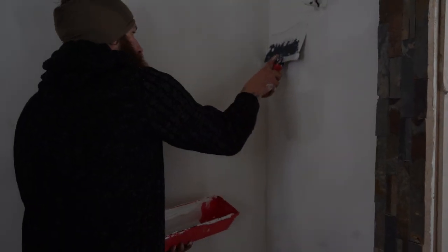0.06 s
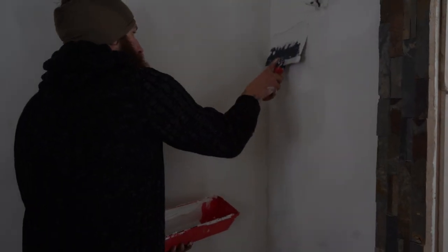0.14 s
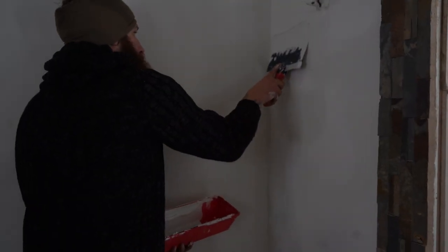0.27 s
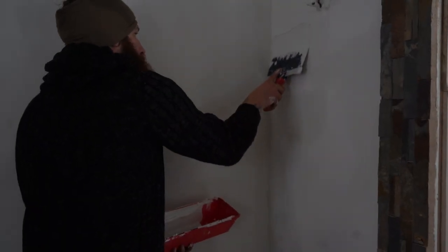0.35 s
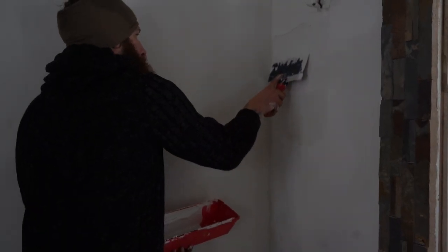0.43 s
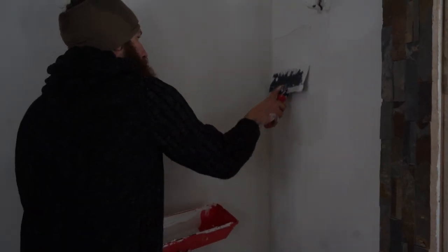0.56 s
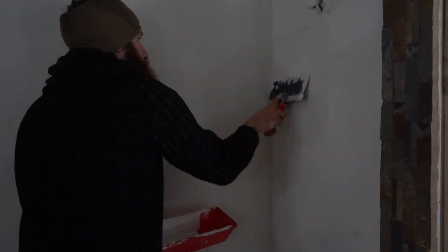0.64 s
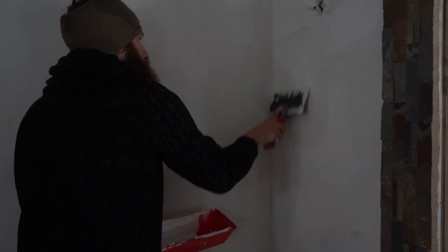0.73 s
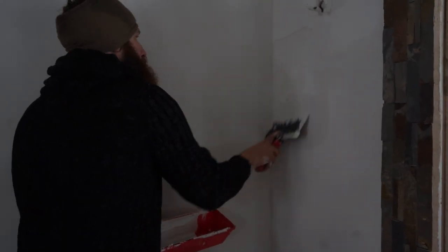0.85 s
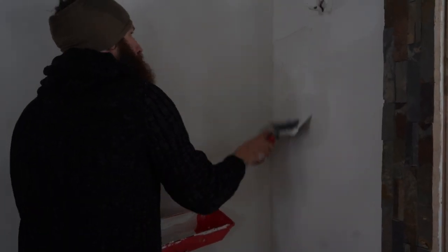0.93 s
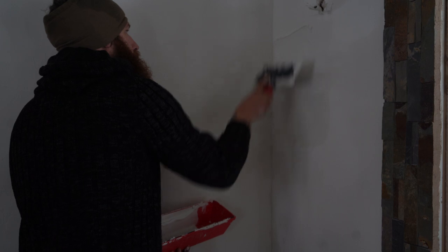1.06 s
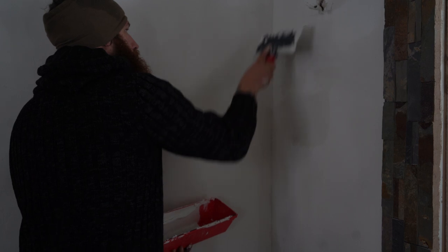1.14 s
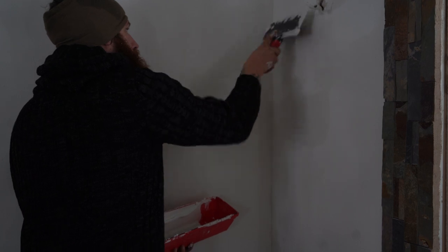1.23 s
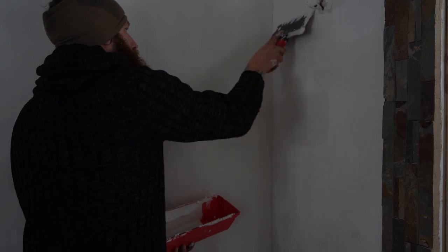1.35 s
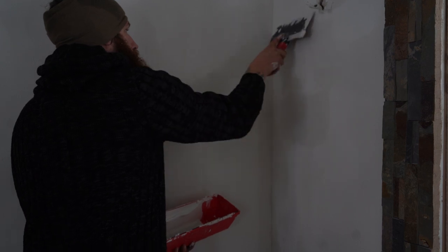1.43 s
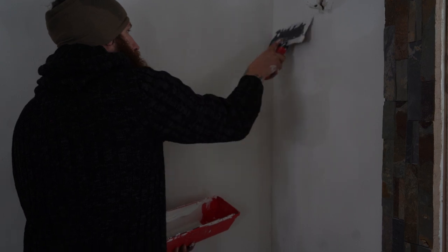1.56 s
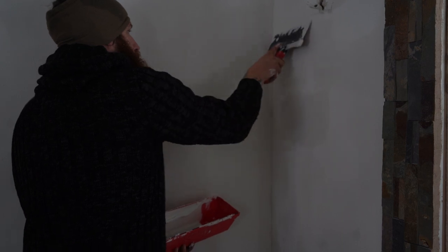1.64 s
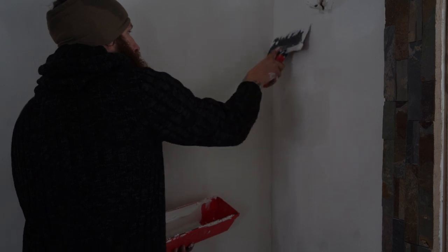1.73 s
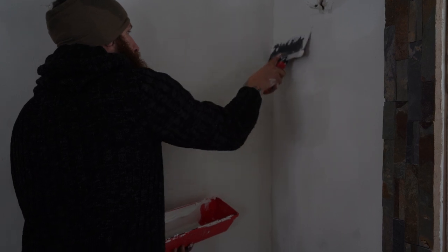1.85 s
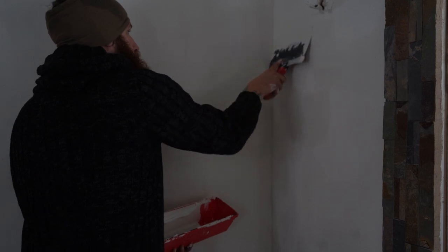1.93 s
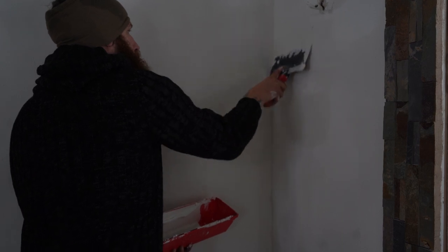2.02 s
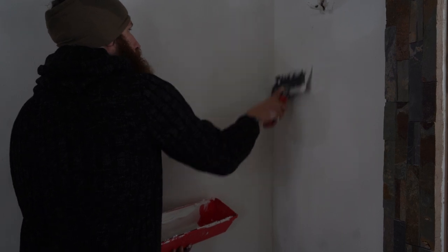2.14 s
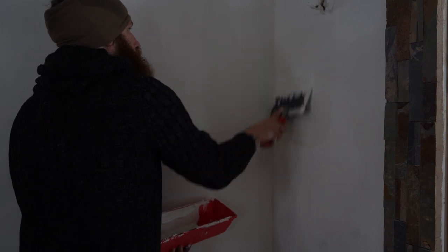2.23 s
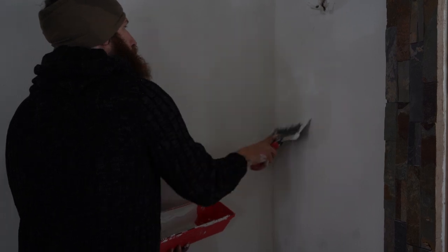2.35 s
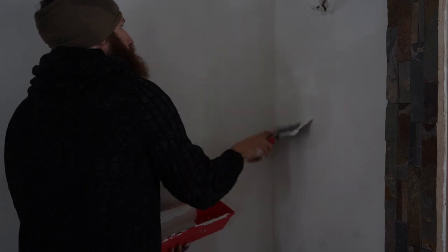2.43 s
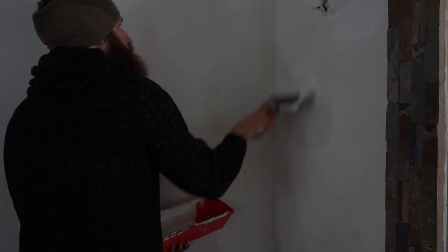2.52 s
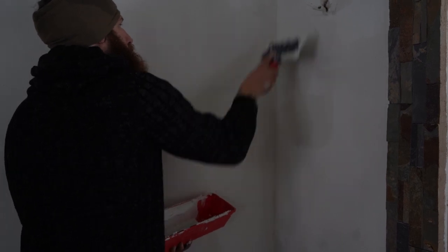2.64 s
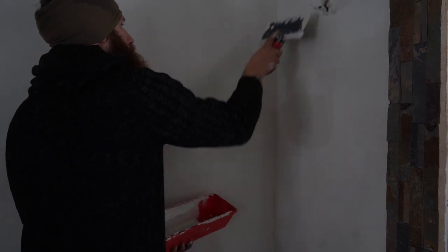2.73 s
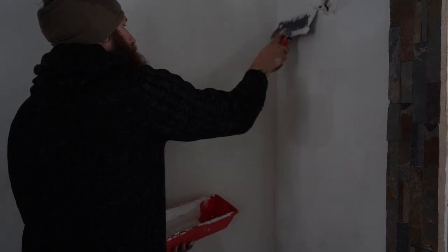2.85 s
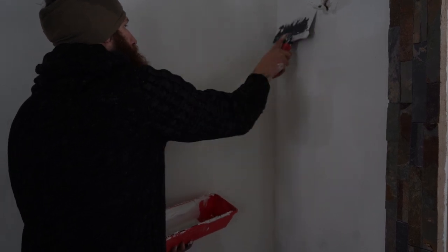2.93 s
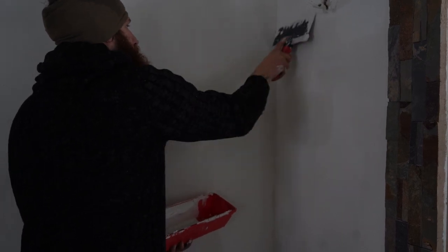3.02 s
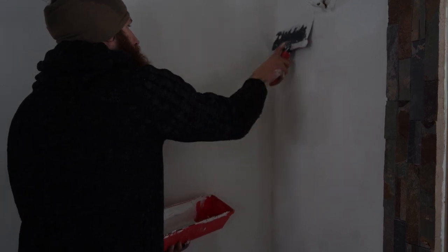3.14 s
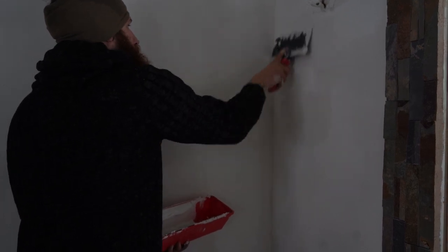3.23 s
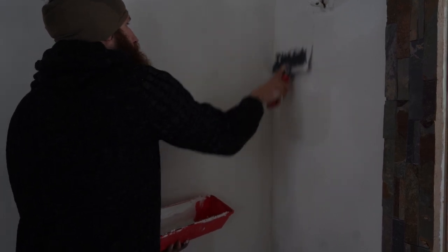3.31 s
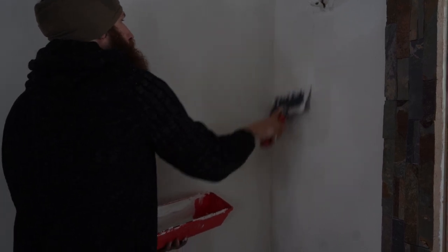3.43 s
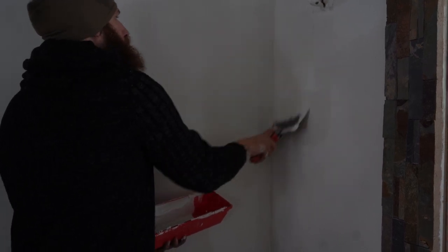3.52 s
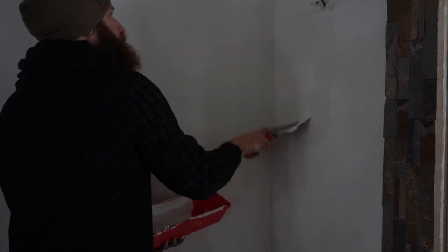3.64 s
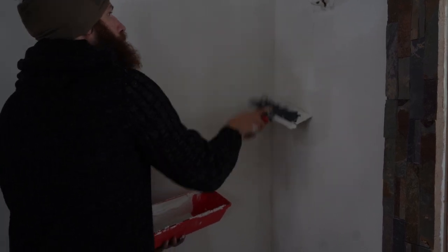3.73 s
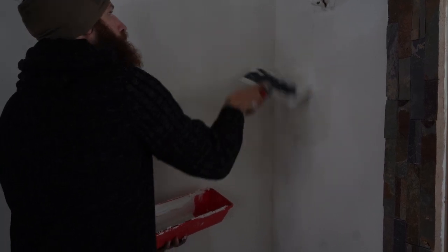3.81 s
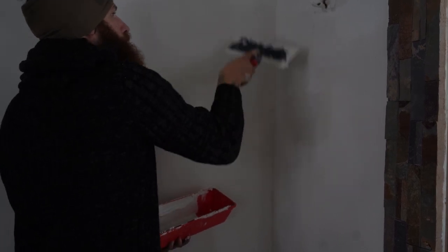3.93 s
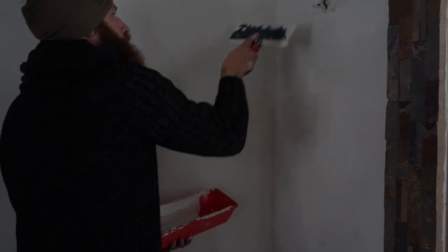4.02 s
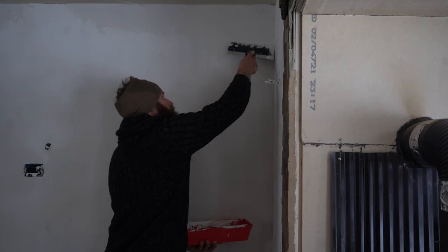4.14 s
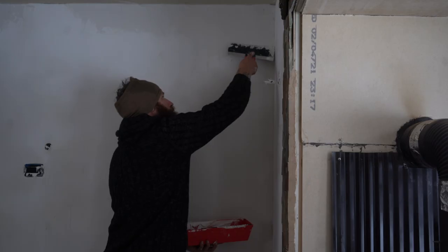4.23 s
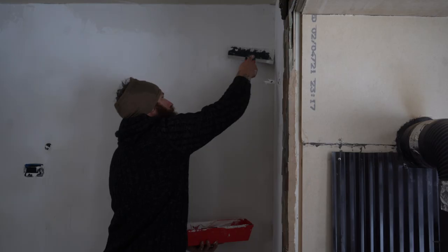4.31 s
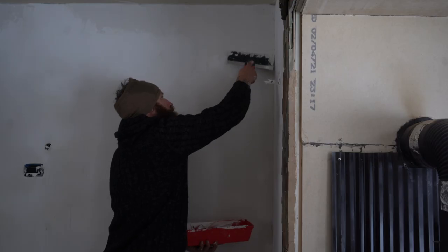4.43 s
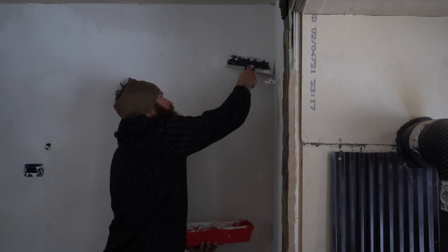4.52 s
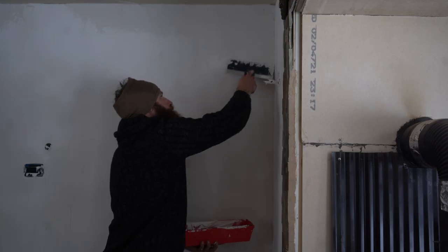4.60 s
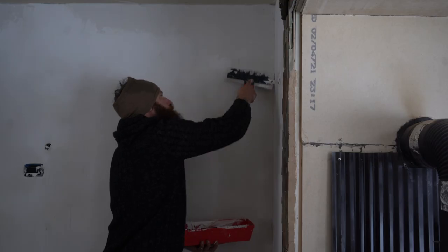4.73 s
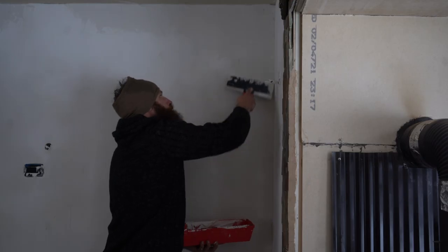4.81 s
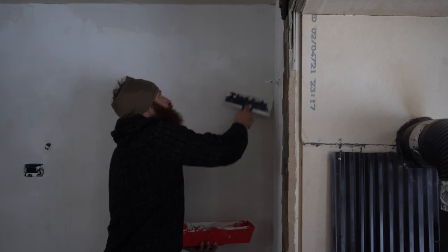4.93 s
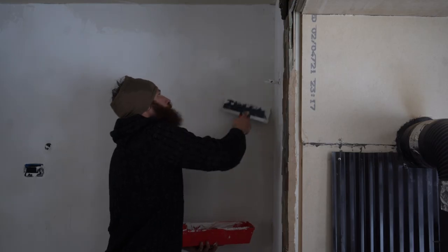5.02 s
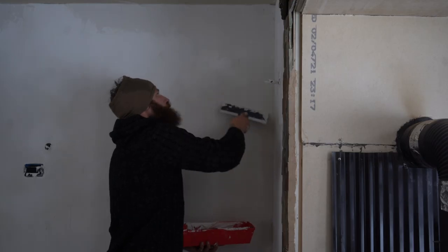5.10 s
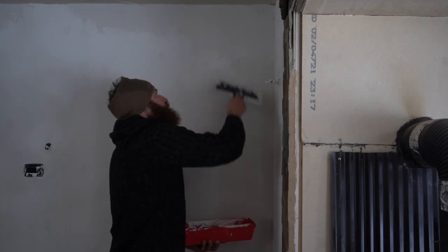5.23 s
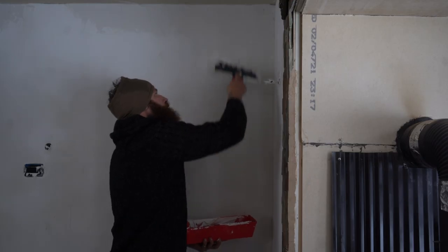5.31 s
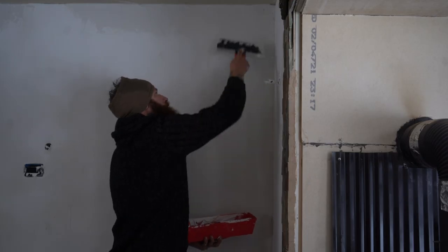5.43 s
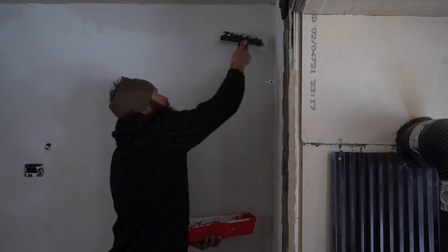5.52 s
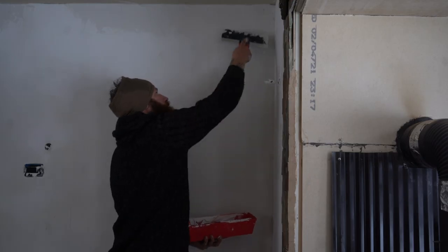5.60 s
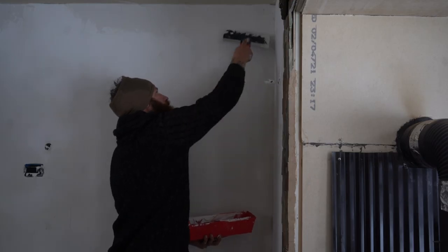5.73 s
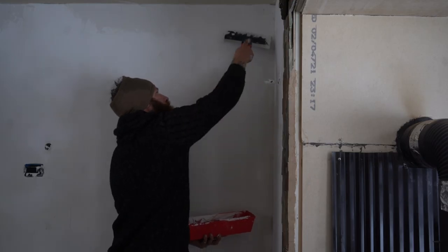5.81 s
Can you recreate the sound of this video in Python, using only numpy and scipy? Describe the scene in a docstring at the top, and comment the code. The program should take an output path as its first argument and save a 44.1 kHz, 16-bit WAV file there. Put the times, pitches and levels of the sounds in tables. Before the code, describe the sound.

A steel taping knife draws joint compound down a wall in a bare room. Three strokes each begin as a soft, wet smear and end in a short, dry, metallic rasp, with a knock as the blade is set down again. A wider knife then makes one quieter, duller stroke. Underneath are quiet room tone, a faint hum and a very low rumble of air at the microphone.

```python
"""A bare room, where a steel taping knife draws joint compound down a wall. Its edge slips over plaster
grains and rings the blade: three strokes start as a soft, wet smear and end in a dry rasp, with a knock
each time the blade is set down again. A wider knife then makes one duller stroke.
Underneath lie a quiet room tone with a faint hum and a very low rumble of air at the microphone."""
import sys
import numpy as np
from scipy import signal
from scipy.fft import rfft, irfft, next_fast_len
from scipy.io import wavfile
from scipy.ndimage import uniform_filter1d, map_coordinates

SR = 44100
rng = np.random.default_rng(int(sys.argv[2]) if len(sys.argv) > 2 else 0)


def digitize_waveform(pressure):
    """Quantize a signal to 16-bit integers and store it at the path in sys.argv[1].

    Rows of a 2-D input are taken as channels; values are limited to [-1, 1].
    """
    field = np.atleast_2d(pressure).T
    bounded = np.clip(field, -1, 1)
    quanta = np.round(bounded * 32767).astype(np.int16)
    wavfile.write(sys.argv[1], SR, quanta)


N = 258426
SECOND_WALL_S = 4.172  # the wide knife takes over, on another wall


def amp(db):
    """Decibels to gain."""
    return 10 ** (np.asarray(db) / 20)


def unit(x):
    """x at rms 1."""
    return x / np.sqrt(np.mean(x ** 2) + 1e-20)


def along(points, hz):
    """Read (f/Hz, value) points on a log frequency axis."""
    freqs, values = np.transpose(points)
    return np.interp(np.log(hz + 1), np.log(freqs + 1), values)


def clock():
    """The time of each sample in seconds."""
    return np.arange(N) / SR


def curve(points):
    """Join (t/s, value) points with straight lines."""
    return np.interp(clock(), *np.transpose(points))


def wobble(rate):
    """A smooth random curve, `rate` knots a second."""
    return map_coordinates(rng.standard_normal(int(N * rate / SR) + 4), [clock() * rate])


def bump(s, half):
    """A bell-shaped swell of height 1 around time s."""
    return np.exp(-np.minimum(((clock() - s) / half) ** 2, 60))


def blow(s, t60, attack):
    """An impact envelope that rises at time s and dies away."""
    t = np.maximum(clock() - s, 0)
    return (1 - np.exp(-t / attack)) * np.exp(-np.log(1000) * t / t60)


def filtered(x, response):
    """Equalise x by a gain that is a function of frequency."""
    size = next_fast_len(N + SR // 2)
    return irfft(rfft(x, size) * response(np.fft.rfftfreq(size, 1 / SR)), size)[:N]


def noise(colour):
    """Noise of rms 1, coloured by (f/Hz, level/dB) points."""
    return unit(filtered(rng.standard_normal(N), lambda hz: amp(along(colour, hz))))


def noise_band(centre_hz, width_hz):
    """Noise of rms 1 around one frequency."""
    band = lambda hz: 1 / (1 + ((hz - centre_hz) / (width_hz / 2)) ** 4)
    return unit(filtered(rng.standard_normal(N), band))


def background():
    """The bed: room tone, a soft hum that differs from wall to wall, and slow air at the microphone."""
    # colours of the room tone and the air rumble: f/Hz, level/dB
    tone_colour = [(26, -36), (45, 4), (96, -1.5), (165, -11.5), (200, -8), (397, -17.5), (438, -17.5),
                   (601, -17.5), (827, -22.5), (912, -18.5), (1030, -26.5), (2480, -27.5), (3020, -30),
                   (5570, -35), (15600, -49.5)]
    rumble_colour = [(3, -20.5), (9, -0.5), (14, 2), (20, -15.5), (35, -26), (60, -48), (120, -83),
                     (300, -120)]
    # hum bands by each wall: f/Hz, width/Hz, level/dB
    first_hum = [(100, 9, -73), (155.4, 14, -68.5), (233.7, 41, -69.5), (2470, 200, -80)]
    second_hum = [(102.8, 8.5, -68.5), (201.8, 9.2, -71), (599, 54, -74), (921, 51, -73.5),
                  (2530, 140, -78.5)]
    # swells of the rumble: t/s, level/dB
    rumble_swells = [(0.0, -32), (0.41, -25), (0.63, -41), (2.08, -34), (2.17, -46), (2.82, -25),
                     (2.95, -43), (4.06, -31), (4.19, -44), (5.85, -49)]
    hum = lambda bands: sum(amp(db) * noise_band(hz, width) for hz, width, db in bands)
    tone = amp(-58) * noise(tone_colour)
    tone += np.where(clock() < SECOND_WALL_S, hum(first_hum), hum(second_hum))
    return tone + amp(curve(rumble_swells)) * noise(rumble_colour)


def reverb_tail():
    """The short ring of the bare walls, of energy 1; the treble dies first."""
    # room decay: f/Hz, t60/s
    decay = [(150, 0.41), (1000, 0.38), (3000, 0.29), (8000, 0.35), (15000, 0.26)]
    hz, t, spectra = signal.stft(rng.standard_normal(SR * 3 // 5), SR, nperseg=256)
    fade = np.exp(-np.log(1000) * t / along(decay, hz)[:, None])
    echo = signal.istft(spectra * fade, SR, nperseg=256)[1]
    return np.pad(echo / np.linalg.norm(echo), (SR // 250, 0))  # 4 ms pre-delay


def room(x, wet_db, block=8192):
    """Add reverb at equal total power; each block gets a new tail, as the moving arm shifts the echoes."""
    wet = np.zeros(N + SR)
    for start in range(0, N, block):
        piece = x[start:start + block]
        if piece.any():
            echo = signal.fftconvolve(piece, reverb_tail())
            wet[start:start + len(echo)] += echo
    return (x + amp(wet_db) * wet[:N]) / np.hypot(1, amp(wet_db))


def clicks():
    """Small, sharp ticks of broad noise."""
    # ticks: t/s, level/dB, t60/s, width/Hz
    ticks = [(.471, -43, .015, 5000), (2.0, -44, .015, 8000), (3.244, -36, .014, 14000),
             (3.289, -43, .015, 14000), (4.172, -46, .0052, 12000), (4.4967, -45, .033, 7000)]
    return sum(amp(db) * blow(s, t60, attack=.0003) * noise_band(3500, width)
               for s, db, t60, width in ticks)


def squeal():
    """A faint squeal on the way up the wall: two thin, unsteady tones that glide together."""
    # pitch of the upper tone: t/s, f/Hz
    pitch = [(3.85, 12600), (3.915, 13500), (3.955, 12600), (4.0, 12850), (4.08, 12450)]
    hz = curve(pitch)
    start, end = pitch[0][0], pitch[-1][0]
    progress = np.clip((clock() - start) / (end - start), 0, 1)
    swell = np.sqrt(np.abs(np.sin(np.pi * progress)))
    tone = lambda ratio: np.sin(2 * np.pi * np.cumsum(ratio * hz * (1 + .004 * wobble(400))) / SR)
    return amp(-79) * swell * (tone(1) + tone(.745))


def chatter():
    """The edge catches: stick-slip locks briefly onto one resonance, with an unsteady pitch."""
    # catches: t/s, half length/s, f/Hz, level/dB
    catches = [(0.79, .02, 1144, -43.5), (0.869, 0.013, 1606, -36.5), (2.195, 0.022, 2286, -37.5),
               (2.372, .02, 1042, -44)]
    out = np.zeros(N)
    for s, half, hz, db in catches:
        phase = 2 * np.pi * np.cumsum(hz * (1 + .012 * wobble(250))) / SR
        out += amp(db) * bump(s, half) * np.sqrt(2) * np.sin(phase)
    return out


def knocks(rebound_s=.036):
    """The springy blade lands and rebounds once: a thud pitched by the spot, a boom, clack and scuff."""
    # landings: t/s, rise/s, board pitch ratio, boom/dB, thud/dB, clack/dB, scuff/dB, rebound/dB
    landings = [(1.3296, .0012, 1.01, -51, -36.5, -45, -58, -11),
                (2.868, .001, .92, -52, -37.5, -55, -55, -3), (3.662, .0045, .95, -36, -53, -49, -51, -13),
                (3.784, .012, .8, -42, -33, -27.5, -42, -20)]
    # thudding modes of the board under the blade: f/Hz, level/dB, t60/s
    board_modes = [(140.5, 0, .16), (224, -5, 0.12), (274, -5.5, 0.092), (322, -4.5, 0.11),
                   (439, -10, 0.065), (600, -16, .05), (960, -16, .05)]
    # colours of the whole wall panel, of blade and handle, and of steel on plaster: f/Hz, level/dB
    boom_colour = [(25, -16), (50, 3), (100, -2), (160, -8), (260, -26), (600, -71.5)]
    clack_colour = [(150, -22), (330, -0.5), (500, -2.5), (650, 1), (800, -7), (1050, -4.5), (2000, -20),
                    (5000, -29)]
    scuff_colour = [(400, -6.5), (1500, 12.5), (5000, 8), (8000, 3), (13000, -5), (16000, -17)]
    boom, clack, scuff = noise(boom_colour), noise(clack_colour), noise(scuff_colour)
    out = np.zeros(N)
    for landing, rise, pitch, boom_db, thud_db, clack_db, scuff_db, rebound_db in landings:
        for s, force in [(landing, 1), (landing + rebound_s, amp(rebound_db))]:
            for hz, db, t60 in board_modes:
                mode = np.sin(2 * np.pi * hz * pitch * (clock() - s))
                out += force * amp(thud_db + db + rng.normal(0, 1)) * blow(s, t60, rise) * mode
            out += force * amp(boom_db) * blow(s, .18, rise) * boom
            out += force * amp(clack_db) * blow(s, .08, rise) * clack
            out += force * amp(scuff_db) * blow(s, .13, rise) * scuff
    return out


def grain_slips(per_s):
    """Tiny slips of the edge over plaster grains, at random times and sizes."""
    counts = rng.poisson(per_s / SR, N)
    return unit(np.sqrt(counts) * rng.standard_normal(N))


def wander(x, depth_db):
    """The contact point wanders along the edge, so resonances swell and fade."""
    spectra = signal.stft(x, nperseg=1024)[2]
    drift = uniform_filter1d(rng.standard_normal(spectra.shape), size=3, axis=0)
    drift = uniform_filter1d(drift, size=5, axis=1)
    return signal.istft(spectra * amp(depth_db * unit(drift)), nperseg=1024)[1][:N]


def friction(slips, colour, modes, ring_db):
    """Slips ring the blade. Three layers of rms 1: low wall board, mid blade, high grit."""
    ring = lambda hz: sum(amp(db) ** 2 / (1 + ((hz - centre) / (width / 2)) ** 2)
                          for centre, width, db in modes)
    scrape = filtered(slips, lambda hz: np.sqrt(amp(along(colour, hz)) ** 2 + amp(ring_db) ** 2 * ring(hz)))
    below = lambda hz, edge: 1 / (1 + (hz / edge) ** 24)
    board = filtered(scrape, lambda hz: below(hz, 2098))
    blade = filtered(scrape, lambda hz: (1 - below(hz, 2154)) * below(hz, 6200))
    grit = filtered(scrape, lambda hz: 1 - below(hz, 6090))
    return np.array([unit(board), unit(blade), unit(grit)])


def glides(fade_s=.03, grit_pivot_db=-60, grit_slope=.85):
    """Board, blade and grit gains as the knife glides on wet compound under steadily changing pressure."""
    # glides: touch/s, end/s, first level/dB, last level/dB, board/dB re blade, grit/dB re blade at pivot
    smears = [(.02, .76, -64, -50.5, -2.5, -7), (1.385, 2.19, -69, -54, -3, -6),
              (2.99, 3.41, -69.5, -48.5, -4.5, -7.5), (3.81, 4.13, -66, -78, 3, -13),
              (4.29, 4.87, -71, -58, -4, -6)]
    # swells over thick compound, dips over thin: t/s, half length/s, swell/dB, extra board/dB
    ridges = [(.17, .07, 3.5, 1), (.675, .105, 12.5, 0), (1.585, .115, 8.5, 3), (1.735, .04, -4, 3),
              (3.29, .05, 3.5, -1)]
    t, out = clock(), np.zeros((3, N))
    swell_db = sum(db * bump(s, half) for s, half, db, _ in ridges)
    drag_db = sum(db * bump(s, half) for s, half, _, db in ridges)
    for touch, end, first_db, last_db, board_db, grit_db in smears:
        blade = np.interp(t, [touch, end], [first_db, last_db]) + swell_db
        grit = grit_pivot_db + grit_db + grit_slope * (blade - grit_pivot_db)  # grows less than the blade
        contact = np.interp(t, [touch - fade_s, touch, end, end + fade_s], [0, 1, 1, 0])
        out += contact * amp([blade + board_db + drag_db, blade, grit])
    return out


def bites(roll, release_db_per_s=350, grit_release_db_per_s=620, board_hold_s=.016):
    """Board, blade and grit gains as the edge bites: fast attack, sagging hold with one lean, release."""
    # rasps: bite/s, lift/s, attack/(dB/s), level/dB, sag/dB, hand's lean/s, lean/dB, extra board/dB
    rasps = [(.755, .872, 500, -30.5, .5, .788, 1.5, -1.5), (2.182, 2.356, 650, -29.5, 4, 2.258, 8, 1.5),
             (3.405, 3.543, 950, -25, 9.5, 3.459, 6.5, -3), (4.866, 5.072, 500, -45.5, 5, 4.96, 1, 0)]
    t, out = clock(), np.zeros((3, N))
    after = lambda s: np.maximum(t - s, 0)
    shares, boards, grits = np.transpose(roll)
    for bite, lift, attack, db, sag_db, lean, lean_db, board_db in rasps:
        share = np.clip((t - bite) / (lift - bite), 0, 1)
        level = db - sag_db * share + lean_db * bump(lean, half=.021) - attack * np.maximum(bite - t, 0)
        board = level + board_db + np.interp(share, shares, boards)
        board -= release_db_per_s * after(lift + board_hold_s)
        blade = level - release_db_per_s * after(lift)
        grit = level + np.interp(share, shares, grits) - grit_release_db_per_s * after(lift)
        out += amp(np.maximum([board, blade, grit], -200))
    return out


def strokes(roll, judder_db):
    """Glides and bites join into the gains of whole strokes; the hand's pressure judders."""
    return np.hypot(glides(), bites(roll)) * amp(judder_db * wobble(90))


def wide_knife():
    """The wider blade drives the wall more and sounds duller."""
    # friction colour: f/Hz, level/dB
    colour = [(120, -44), (200, -14), (258, -5.5), (288, -31), (365, -8), (471, -15), (976, -11),
              (1310, -7), (1630, -3.5), (2340, -10.5), (3900, -12), (7650, -24), (11400, -24.5),
              (15600, -31)]
    # blade resonances: f/Hz, width/Hz, level/dB
    modes = [(1025, 260, 4.5), (1600, 73, -5), (2520, 55, -7), (2960, 94, -20), (3170, 38, -12.5),
             (3740, 67, -6)]
    # the blade rolls over as it bites: share of the bite, board/dB, grit/dB, both re blade
    roll = [(0, 0, -11), (.55, 7.5, -12.5), (1, 5, -12.5)]
    scrape = friction(wander(grain_slips(per_s=12000), depth_db=1.2), colour, modes, ring_db=-6)
    return (clock() >= SECOND_WALL_S) * np.sum(strokes(roll, judder_db=1.0) * scrape, axis=0)


def narrow_knife(crossfade_db=-39, softness_db=3.5):
    """Light pressure smears wet compound; hard pressure bares the edge, which rasps."""
    # wet and dry friction colours: f/Hz, level/dB
    wet_colour = [(150, -30), (250, -5.5), (353, -1.5), (614, -5), (730, -5), (1140, -2.5), (1640, -6.5),
                  (1960, -2), (2170, -9), (5240, -10), (7270, -20), (12200, -21.5), (15600, -30)]
    dry_colour = [(88, -48.5), (150, -11), (326, -18.5), (420, -10.5), (540, -17), (1130, -6.5),
                  (1320, -7.5), (1840, -3.5), (2150, -12), (2410, 0), (3160, -1), (5350, -2.5),
                  (6130, -11.5), (9580, -17.5), (15600, -25)]
    # resonances of the blade held loosely and pressed on the wall: f/Hz, width/Hz, level/dB
    loose_modes = [(1090, 170, 0), (1963, 141, -1), (2580, 80, -7.5), (3840, 380, 2), (5250, 300, -2.5)]
    pressed_modes = [(1090, 80, -5), (1850, 150, -7), (2470, 110, -7), (2850, 160, -3.5), (3110, 120, -1.5),
                     (3580, 170, -2.5), (4050, 200, -4.5), (5400, 160, -2)]
    # the blade rolls over as it bites: share of the bite, board/dB, grit/dB, both re blade
    roll = [(0, -8.5, -12), (.35, -6.5, -11.5), (.66, -12.5, -5.5), (1, -2, -6.5)]
    smear = friction(wander(grain_slips(per_s=12000), depth_db=1.6), wet_colour, loose_modes, ring_db=-10)
    dense_slips = wander(grain_slips(per_s=40000), depth_db=1.83)
    rasp = friction(dense_slips, dry_colour, pressed_modes, ring_db=-4.5)
    gains = strokes(roll, judder_db=.4)
    blade_db = 20 * np.log10(gains[1])
    bareness = 1 / (1 + np.exp((crossfade_db - blade_db) / softness_db))
    scrape = np.sqrt(1 - bareness) * smear + np.sqrt(bareness) * rasp
    return (clock() < SECOND_WALL_S) * np.sum(gains * scrape, axis=0)


def scene():
    """Both knives and the impacts in the room, over the bed, in mono."""
    scraping = room(narrow_knife() + chatter() + squeal(), wet_db=-8) + room(wide_knife(), wet_db=-6.5)
    impacts = room(knocks() + clicks(), wet_db=-10)
    return (scraping + impacts + background())[None]


def record(dry, soft_hz=15300, top_hz=15720):
    """The microphone softens the highest treble, and a hard band limit cuts off the rest."""
    return filtered(dry[0], lambda hz: (hz < top_hz) / np.sqrt(1 + (hz / soft_hz) ** 20))[None]


dry = scene()
out = record(dry)
digitize_waveform(out)
```